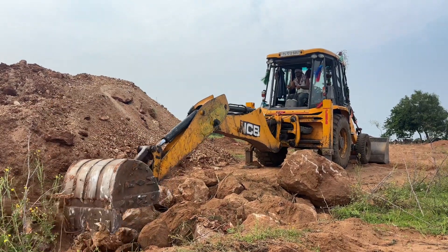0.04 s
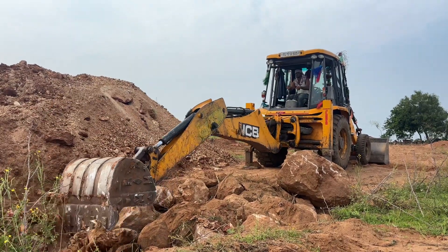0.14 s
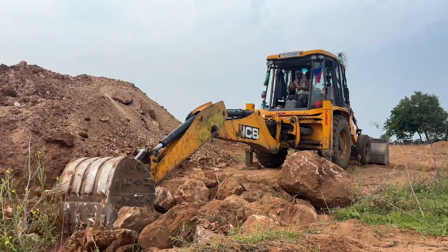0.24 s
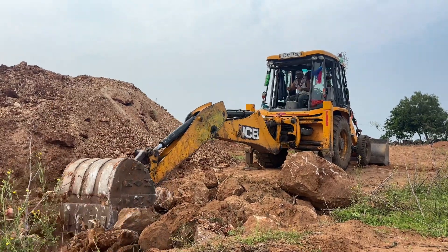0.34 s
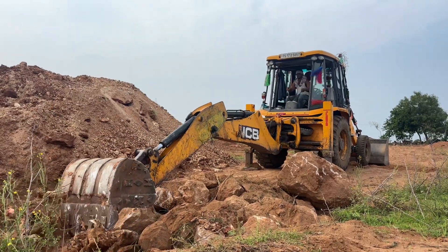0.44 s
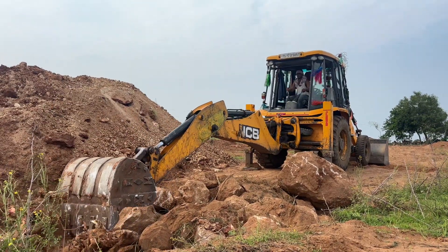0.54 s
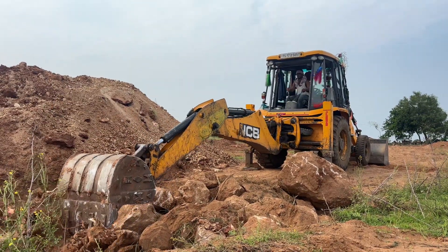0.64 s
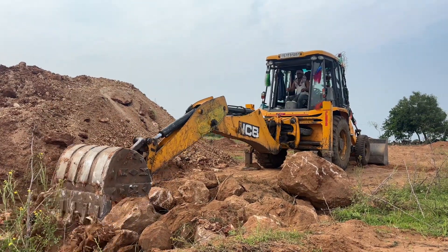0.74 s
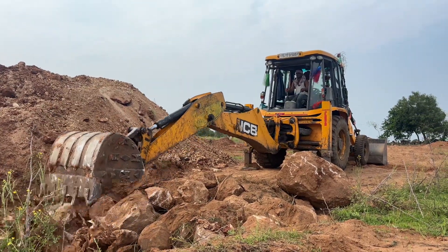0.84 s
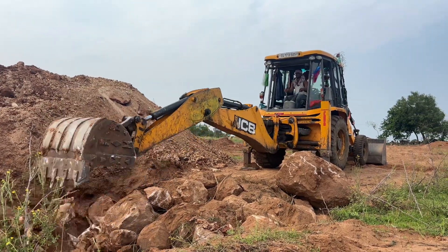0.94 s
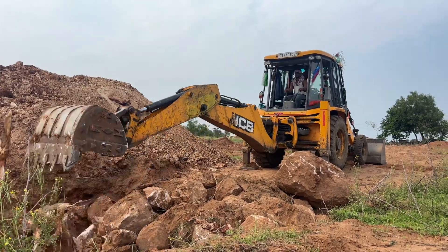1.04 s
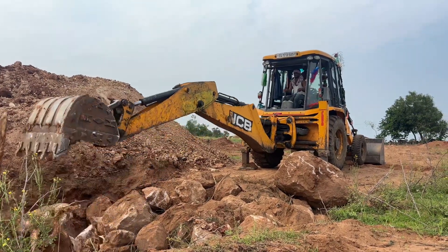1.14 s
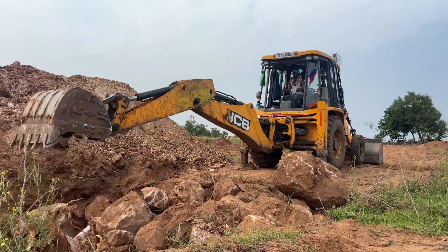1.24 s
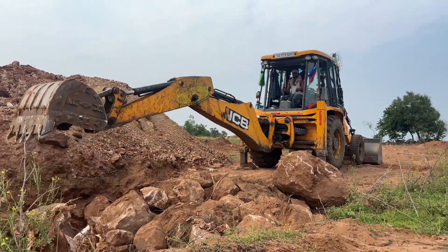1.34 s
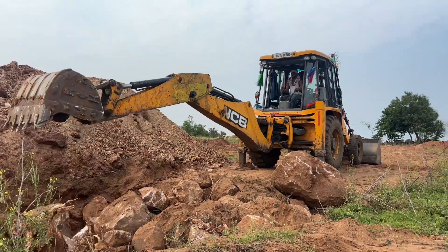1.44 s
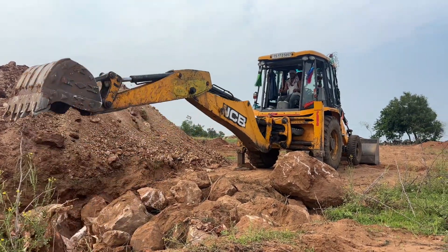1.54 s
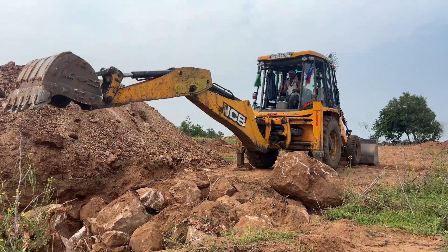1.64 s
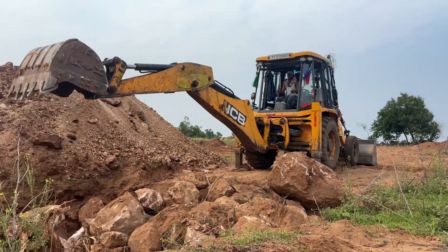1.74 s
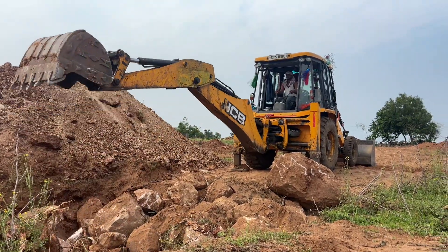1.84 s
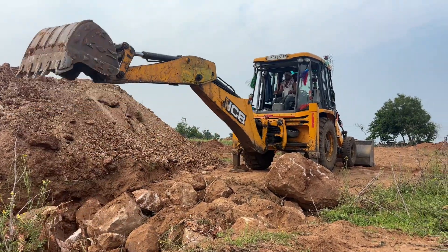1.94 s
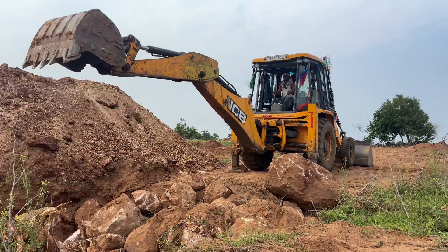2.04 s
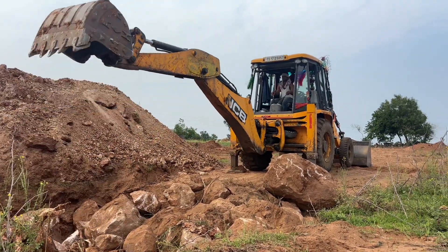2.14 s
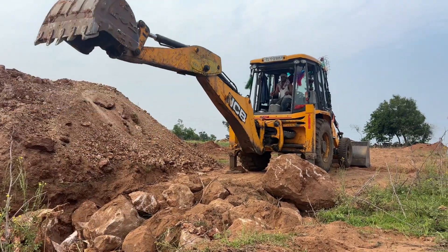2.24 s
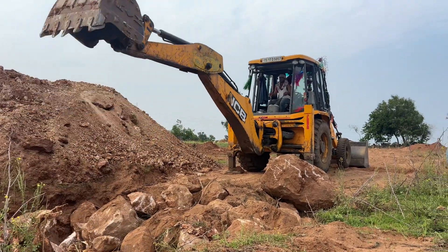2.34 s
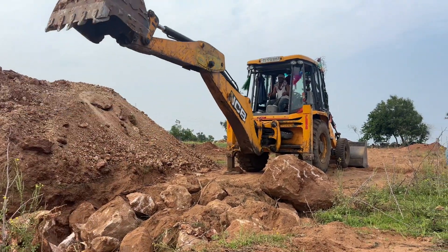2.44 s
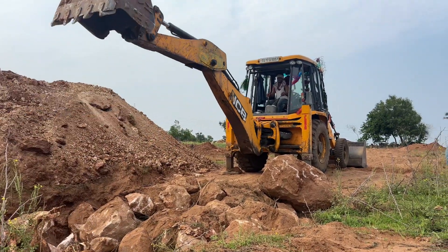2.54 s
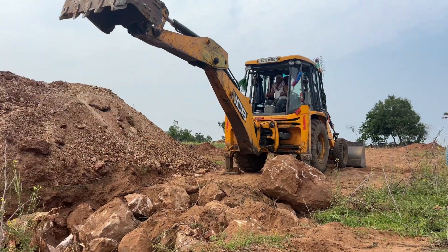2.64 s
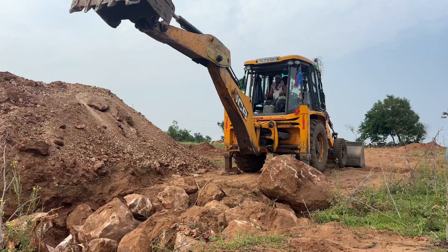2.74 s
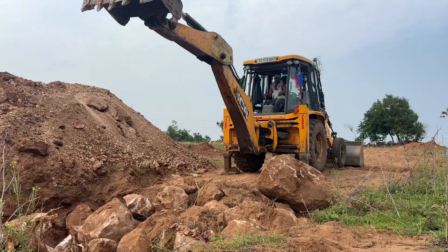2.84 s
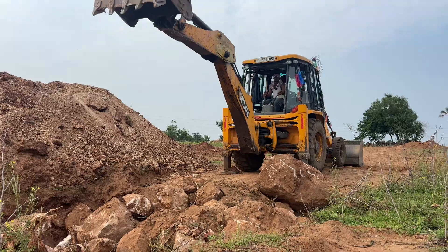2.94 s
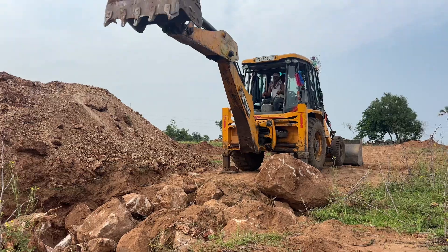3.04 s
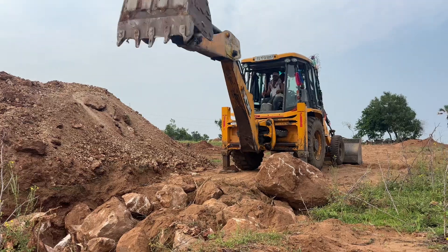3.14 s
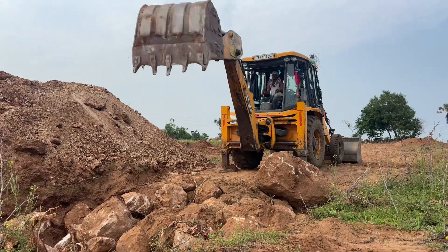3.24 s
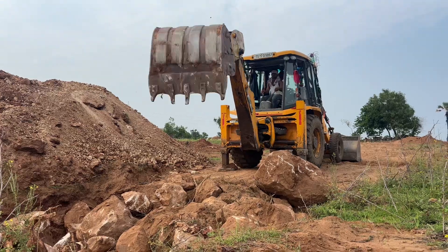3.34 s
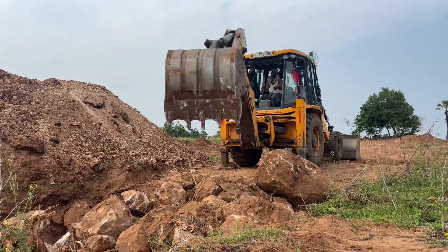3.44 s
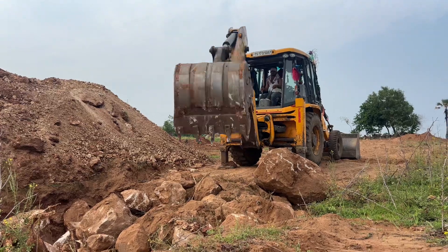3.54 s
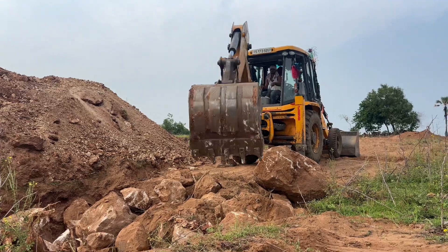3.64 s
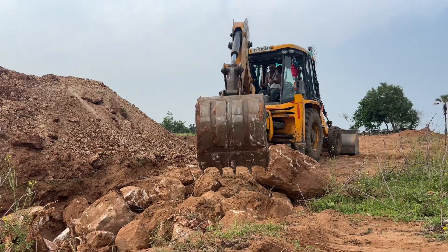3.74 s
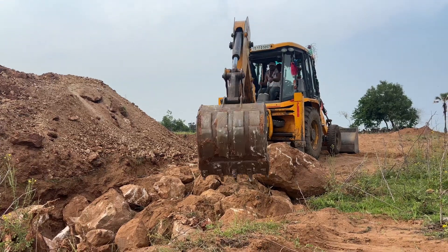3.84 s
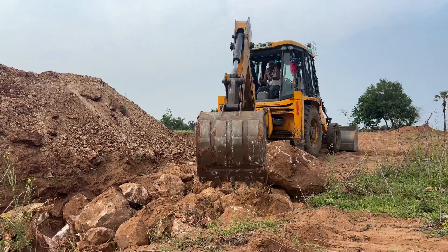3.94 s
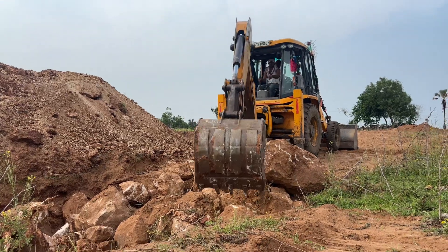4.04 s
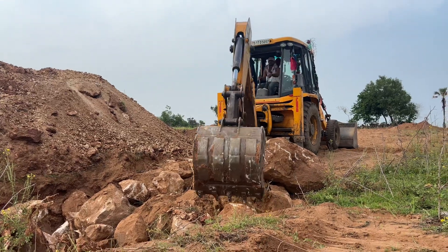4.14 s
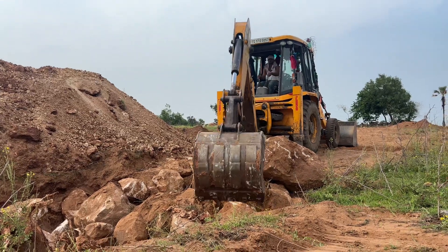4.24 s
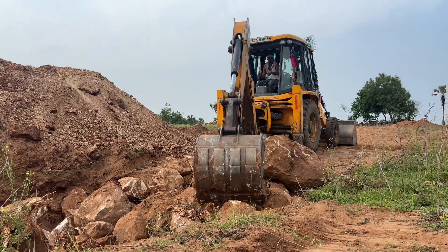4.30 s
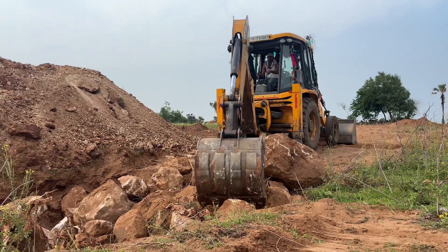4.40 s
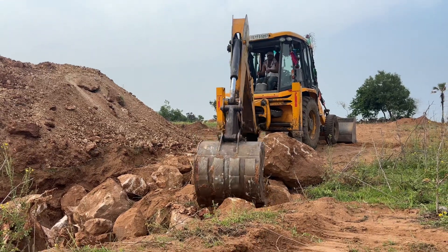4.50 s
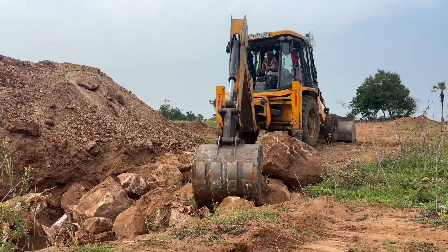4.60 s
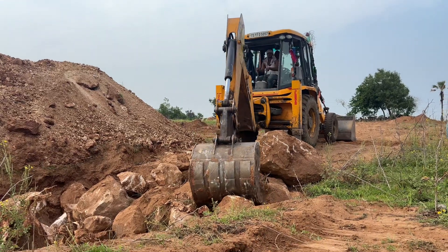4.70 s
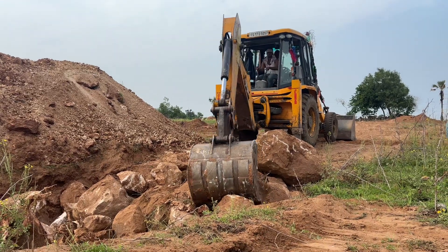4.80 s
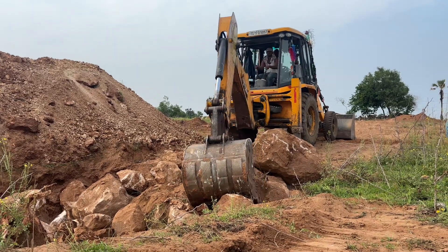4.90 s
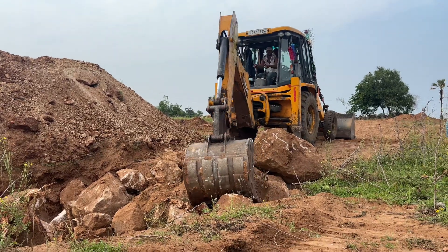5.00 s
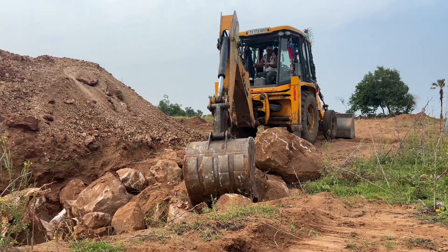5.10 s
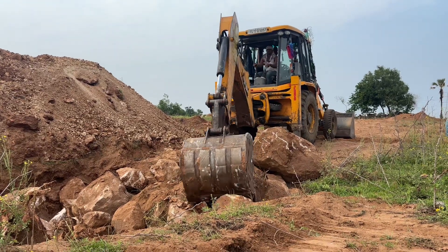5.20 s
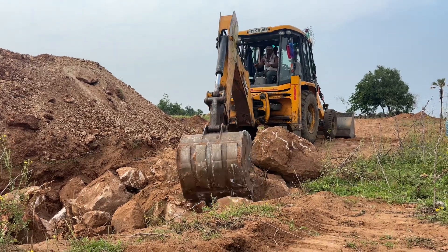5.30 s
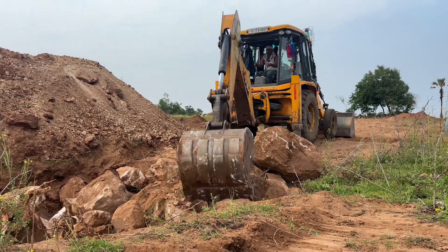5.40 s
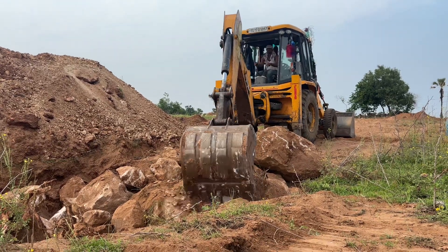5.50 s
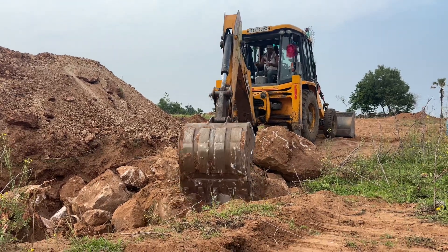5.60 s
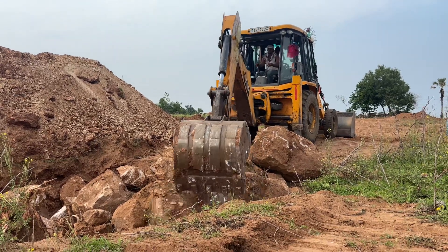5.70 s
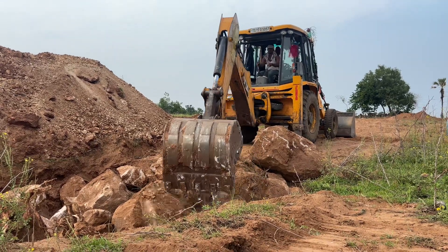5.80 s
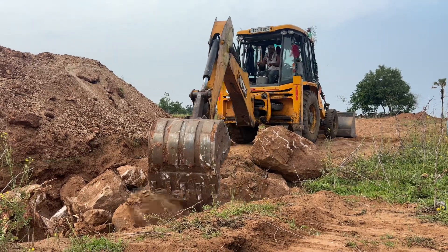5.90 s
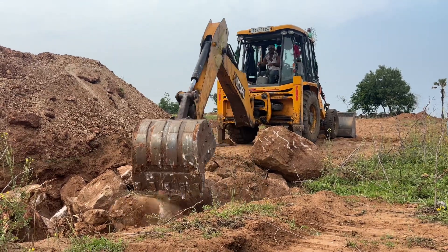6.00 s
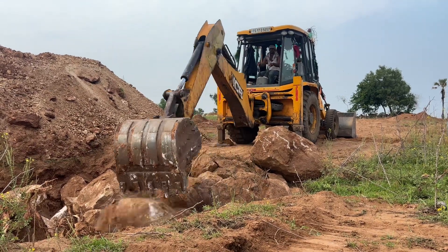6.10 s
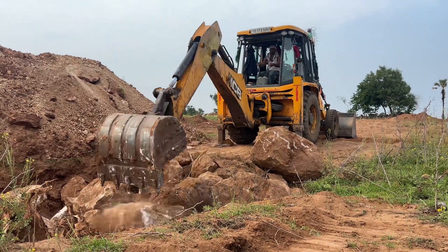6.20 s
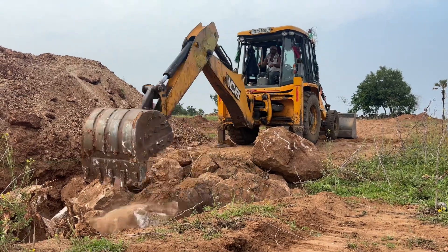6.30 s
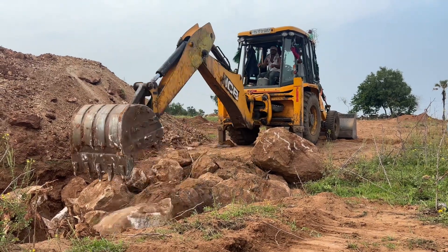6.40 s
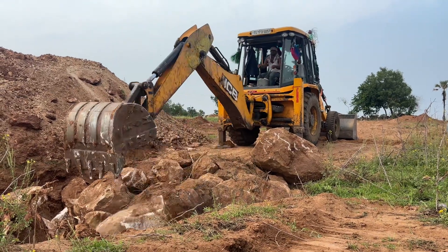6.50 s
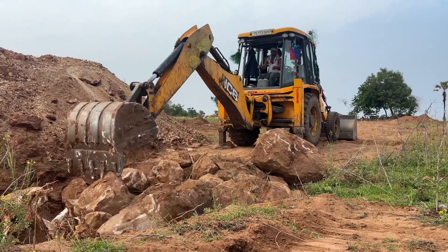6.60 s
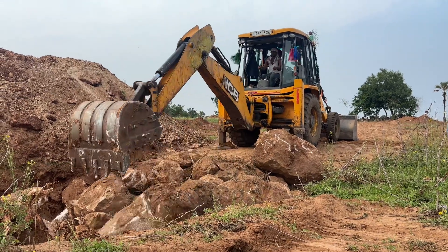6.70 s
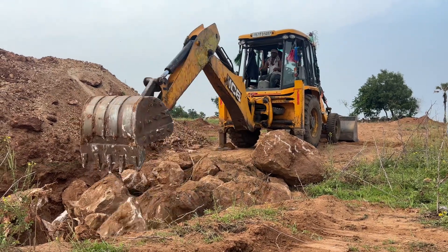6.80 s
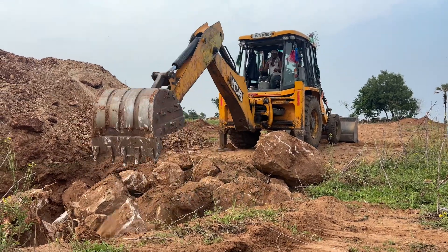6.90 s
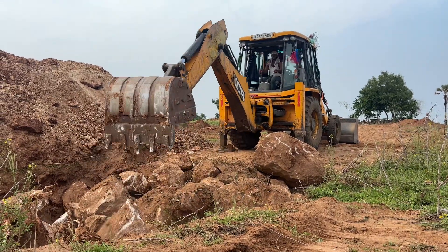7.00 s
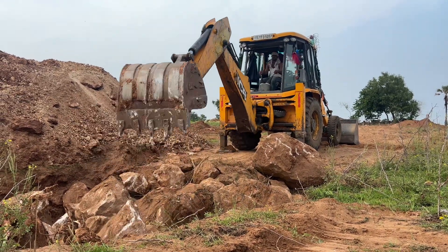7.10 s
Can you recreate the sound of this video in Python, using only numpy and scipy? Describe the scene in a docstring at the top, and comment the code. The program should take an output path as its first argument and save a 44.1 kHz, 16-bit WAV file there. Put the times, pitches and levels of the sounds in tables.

```python
"""A diesel backhoe loader works a heap of boulders in the open: first the pump whines over the engine's
boom and clatter while soil pours and stones and steel knock. The engine eases as the arm swings and oil
rushes at about 3.2 s; a gust swells; from 4.2 s the teeth drag through soil and rubble, and near 5.9 s
a boulder rolls over before the engine labours again. Exhaust and whine are tones locked to the firing,
blows are showers of fractures through ringing steel, and soil, oil and wind are shaped noise."""
import sys
import numpy as np
from scipy import signal
from scipy.fft import rfft, irfft, next_fast_len
from scipy.io import wavfile

SR = 44100
rng = np.random.default_rng(int(sys.argv[2]) if len(sys.argv) > 2 else 0)


def to_wav(sig):
    """Store sig (one row per channel, or 1-D mono) as 16-bit WAV at the path in sys.argv[1].

    Samples outside -1..1 are clipped; the rate is SR.
    """
    pcm = np.clip(np.atleast_2d(sig), -1, 1) * 32767
    pcm = np.round(pcm).astype(np.int16)
    wavfile.write(sys.argv[1], SR, pcm.T)  # frames by channels


N = 315315

# Blows on the bucket: (time [s], clang level [dB], clang centre [Hz], splinters against clang [dB])
BLOWS = [(0.116, -18.5, 1100, -23), (0.242, -21.5, 3200, -7.5), (0.255, -11.5, 1400, -16.5),
         (0.339, -25, 1460, -30), (0.495, -28.5, 1190, -34), (0.577, -23.5, 1300, -14),
         (0.587, -15, 900, -19), (0.609, -15, 1400, -20.5), (0.752, -25, 1150, -22),
         (1.154, -22, 1070, -20), (1.177, -21, 1060, -19), (1.435, -24.5, 1270, -47),
         (2.162, -26.5, 1100, -24), (2.367, -27, 925.6, -27), (3.333, -31, 1002, -37),
         (2.758, -24.5, 915, -23), (4.473, -14, 1080, -16), (4.689, -24, 900, -36), (4.798, -21, 795, -27),
         (4.922, -27, 1582, -10.5), (5.167, -23.5, 510, -20), (5.215, -23, 591.5, -24),
         (5.26, -25.5, 1700, -29), (5.298, -26, 1280, -27), (5.496, -19, 1810, -11.5),
         (5.53, -12.5, 1150, -16), (5.721, -25.5, 1890, -5), (5.755, -17, 458, -25.5),
         (5.803, -21.5, 1934, -31), (5.85, -15, 2230, -6), (5.874, -9.5, 1460, -6),
         (5.928, -14.5, 1020, -25), (5.989, -20.5, 1150, -42), (6.005, -15.5, 1232, -59),
         (6.046, -12.5, 1060, -28), (6.07, -18.5, 2500, -8), (6.126, -8.5, 893, -13),
         (6.198, -20.5, 1470, -27), (6.269, -26, 1699, -38), (6.372, -23.5, 1080, -38),
         (6.387, -19, 962, -26), (6.914, -24.5, 730, -36), (7.058, -22, 970, -25)]
# Edges of the thump, clang and splinter bands: (frequency [Hz])
BLOW_EDGES_HZ = [150, 480, 4800, 14500]
CRUMBLE_T60_S, CRUMBLE_SHORTENS = 0.14, 0.64  # for a clang at 1 kHz; exponent: brighter blows die sooner
THUMP_DB, THUMP_DB_PER_OCTAVE = -4, 0.5  # against a 1 kHz clang; change per octave of clang centre
# Resonances of the steel bucket: (frequency [Hz], width [Hz], level [dB])
BUCKET_MODES = [(241, 32, 3), (368.4, 23, -1), (484, 50, -6), (565, 22, 1.5), (706, 41, -0.5),
                (820.3, 16.7, 5), (947, 260, -4.5), (1074, 15, 0), (1365, 100, -8.5), (1466, 39, 1),
                (1733, 116, -5), (2082, 74, 1.5), (2130, 240, -3), (2500, 1400, -24.5), (2802, 61, 1),
                (3180, 620, -1.5), (3500, 90, 2), (3750, 127, -2), (4390, 110, -5.5), (4940, 32, -5),
                (7040, 140, -12.5), (8640, 360, -3.5)]

# Force of the teeth in the ground: (time [s], push [dB])
PUSH = [(4.25, -7), (4.5, -4.5), (4.8, -1), (5.03, -5), (5.22, 5), (5.42, -4), (6.05, 9.5), (6.3, -9.5),
        (6.7, -8), (7.15, -10)]
# Fade of the dragging as the teeth bite in: (time [s], gain [0-1])
BITE = [(4.2, 0), (4.45, 1)]
RUMBLE_DB, RUMBLE_FOLLOWS = -22.5, 0.52  # at 0 dB of push; share of the push's swing
GRIND_DB, CRUNCH_DB = -34, -41.5  # low and high voice of stones on steel, at 0 dB of push
GRIT_DB, GRIT_FOLLOWS = -52, 0.7  # at 0 dB of push; share of the push's swing
KNOCKS_PER_S, KNOCKS_DB = 22, -45  # random stones bumping the bucket; level at 0 dB of push
ROLL_S, ROLL_HOLD_S, ROLL_DB = 5.86, 0.21, -26.5  # a boulder scrapes along the steel as it rolls

# Rocks knocking on one another: (time [s], peak level [dB], pitch [Hz])
ROCKS = [(0.256, -5, 2620), (0.589, -6, 930), (0.612, -5.5, 1700), (2.759, -15.5, 1420),
         (4.479, -11.5, 1710), (4.645, -19, 1360), (4.691, -21, 1800), (4.798, -13.5, 1400),
         (4.923, -23.5, 3900), (4.85, -28, 2878), (5.214, -22, 4316), (5.263, -21, 2420),
         (5.3, -23.5, 2500), (5.497, -8, 2330), (5.53, -7.5, 2246), (5.938, -8.5, 1325), (6.009, 1.5, 1280),
         (6.06, -6, 1400), (6.156, -12, 2630), (6.361, -9, 1360), (6.39, -11, 1750)]
# Resonances of a rock: (multiple of its pitch, level [dB])
ROCK_MODES = [(0.76, -16), (1, 3), (1.3, -7.5), (1.66, -6)]
ROCK_Q = 10
# Rubble crushed under the teeth: (start [s], hold [s], level [dB])
RUBBLE = [(4.527, 0.3, -39.5), (5.106, 0.1, -33.5)]
# Small stones ticking on stone, and a brief squeal of steel at 4.84 s: (time [s], level [dB], pitch [Hz])
PEBBLES = [(0.828, -20, 4770), (1.061, -17.5, 6600), (1.253, -7, 6559), (4.843, -12.5, 7840),
           (5.409, -21, 2767), (6.101, 2, 13000)]
# Soil pouring off the teeth: (start [s], hold [s], level [dB])
POURS = [(-0.1, 0.16, -51.5), (0.687, 0.17, -49)]
# Hollow clunks of the arm and bucket: (time [s], level [dB], pitch [Hz])
CLUNKS = [(2.185, -26, 412), (3.336, -18.5, 476), (4.505, -14.5, 469.8), (4.585, -21, 485.6),
          (4.647, -18, 698), (6.137, -9.5, 484), (6.272, -13, 699.2), (7.023, -22, 689.5)]
# Boulders shifting in the ground: (time [s], level [dB], pitch [Hz])
THUDS = [(4.338, -13, 191), (4.488, -8, 115.6), (4.6, -14, 132), (5.166, -4, 283.8), (5.218, -6.5, 106.5),
         (5.281, -9.5, 115.6), (5.539, -8.5, 133), (5.78, -24, 101.8), (6.139, -11.5, 106),
         (6.726, -16, 210.4)]

# Engine effort as the arm curls, lifts, swings freely, digs and lifts again:
# (time [s], load [dB], where 0 is working hard)
LOAD = [(0, 0), (0.33, -2), (0.5, 1.5), (0.74, -4.5), (0.88, 0), (1.3, -1), (1.75, -0.5), (2.85, 0.5),
        (3.15, -5), (3.7, -11), (4.3, -9), (4.9, 1.5), (5.7, -0.5), (6.45, -5.5), (6.8, -7), (7.15, 1)]
# Engine speed, rising and sagging: (time [s], firing rate [1/s])
SPEED = [(0, 43.6), (0.2, 48), (0.42, 44.2), (0.63, 45), (0.85, 44.5), (1.25, 46.9), (1.6, 44.3), (2.4, 46),
         (2.8, 44.8), (3.05, 46), (3.45, 47.9), (4.2, 45.8), (5.1, 44), (5.9, 43.5), (6.35, 47), (7.15, 46)]
# Upper exhaust tones: (multiple of the firing rate, level against the octave tone [dB])
OVERTONES = [(1.5, -22), (2.5, -19.5), (3, -10), (4, -17), (5, -31.5), (5.5, -30), (7.5, -26)]
OCTAVE_DB = -21.5  # exhaust tone at twice the firing rate, at 0 dB of load
FIRING_DB, FIRING_FOLLOWS = -27.5, 0.19  # tone at the firing rate, at 0 dB of load; share of its swing
# Resonances of the engine block and panels: (frequency [Hz], width [Hz], level [dB])
BLOCK_MODES = [(234, 14, -1), (329.2, 18.4, 9.5), (458, 42, 3), (548, 25, 4.5), (705, 236, -3.5),
               (759, 19, 8), (924, 34, 4.5), (1093, 55, 1), (1400, 57, -3.5), (1699, 42, -7),
               (1755, 53, -7.5), (2170, 75, -15), (2610, 76, -10.5)]
RATTLE_DB, RATTLE_FOLLOWS = -36, 0.5  # at 0 dB of load; share of the load's swing
WHINE_DB, WHINE_FOLLOWS = -46, 0.85  # gear pump at 0 dB of load; share of the load's swing
WHINE_ORDER = 11.35  # multiple of the firing rate
CURL_HOLD_S, CURL_WHINE_DB = 1.0, 5.5  # extra whine until the bucket is out of the heap
# Faintly singing timing gears: (multiple of the firing rate, level [dB])
GEAR_TONES = [(52, -66), (78, -63.5)]
# Spectrum of the oil flow and fan: (frequency [Hz], level per Hz [dB])
HISS = [(200, 9), (900, 7), (2000, 4), (3500, 0), (4600, -4.5), (6000, -14.5), (7400, -5.5), (9000, -10.5),
        (12500, -12), (14500, -10), (16000, -28)]
# Resonances of oil singing in the valves: (frequency [Hz], width [Hz], level [dB])
VALVE_MODES = [(1069, 22, -4.5), (1307, 26, 2.5), (1374, 24, 3), (1732, 40, -1), (2214, 20, -2),
               (3200, 200, -20), (3715, 110, -13)]
HISS_DB, VALVES_DB = -46.5, -49.5  # oil flow between swings
SWING_S, SWING_HOLD_S, SWING_FLOW_DB = 3.18, 0.048, 4.5  # extra oil flow as the arm swings over

GUST_S, GUST_HOLD_S, GUST_DB = 3.94, 0.49, -29  # start, hold, level before its wavering

# Lead of the left microphone port over the right: (frequency [Hz], phase [rad])
PORT_LEAD = [(0, 0), (1380, -0.3), (1640, -0.8), (2840, 0.5), (4740, 0.2), (5080, -0.5), (5600, -1.2),
             (6400, 0), (7490, -0.0), (8180, -0.9), (9130, -2.7), (9950, -3.14), (10900, -3.7),
             (11800, -6.1), (13700, -6.4), (14600, -9.3), (16100, -9.5)]
# Left port louder than the right by: (frequency [Hz], level [dB])
PORT_BALANCE = [(60, -1.5), (99, 0.5), (160, 1), (270, 0.0), (450, 1.5), (740, -0.5), (1220, 0.5),
                (2010, -0.5), (3330, -1.0), (5500, 1.5), (9080, -2), (15000, 1.5)]
CUTOFF_HZ = 16500


def blows(snap, snap_s, tail_db, tail_t60, chip_s, rebound_s, rebound_db):
    """A snap, a rebound and dying fractures excite a thump, a stone-coloured clang and splinters."""
    t = np.arange(SR // 3) / SR
    out = np.zeros(N)
    low, middle, high, top = BLOW_EDGES_HZ
    for s, db, hz, splinter_db in BLOWS:
        octaves = np.log2(hz / 1000)
        t60 = CRUMBLE_T60_S * 2 ** (-CRUMBLE_SHORTENS * octaves)
        shape = from_db(-60 * t / t60) + snap * np.exp(-t / snap_s) + from_db(tail_db - 60 * t / tail_t60)
        since_rebound = t - rebound_s * rng.uniform(0.43, 1.8)
        rebound = (since_rebound > 0) * np.exp(-np.abs(since_rebound) / snap_s)
        shape = shape + from_db(rebound_db) * rebound
        steel = bucket(shape * grains(6000, 3.1, size=len(t)))

        # The stone's broad peak is applied twice to steepen its colour.
        stone = signal.iirpeak(np.clip(hz, 300, 6000), .74, fs=SR)
        coloured = signal.lfilter(*stone, signal.lfilter(*stone, steel))
        clang = band(coloured, middle, high)
        thump = band(steel, low, middle)
        splinters = band(signal.lfilter([1], [1, -.7], steel), high, top) * np.exp(-t / chip_s)
        thump_db = THUMP_DB + THUMP_DB_PER_OCTAVE * octaves
        for part, part_db in (clang, 0), (thump, thump_db), (splinters, splinter_db):
            # Every part carries the energy of the envelope.
            matched = part * np.linalg.norm(shape) / np.linalg.norm(part)
            add(out, s, from_db(db + part_db) * matched)
    return out


def bucket(force, contact_db=-12, uneven_db=2.5):
    """Bare contact plus ringing steel; each call draws a new mix of modes, like a new point of touch."""
    return from_db(contact_db) * force + resonate(force, BUCKET_MODES, uneven_db)


def drag(judder_db, bump_s):
    """Teeth stick and slip: pushing harder brings more rumble, grinding, bumping stones and grit."""
    push_db = in_time(PUSH)[0]
    slip = rms_one(from_db(judder_db * drift(29.0)))
    steel = bucket(slip * grains(2500, 4.7))

    rumble_noise = rms_one(band(rng.standard_normal(N), 47.3, 124.3))
    rumble = from_db(RUMBLE_DB + RUMBLE_FOLLOWS * push_db) * rumble_noise
    grind = from_db(GRIND_DB + push_db) * rms_one(band(steel, 153, 550))

    # Each random bump starts a short exponential swell of the crunch.
    hits = np.abs(grains(KNOCKS_PER_S, 0.5)) + 1e-18
    bumps = rms_one(signal.lfilter([1], [1, -np.exp(-1 / (bump_s * SR))], hits))
    roll = swell(ROLL_S, attack_s=0.12, hold_s=ROLL_HOLD_S, release_s=0.08)
    rolling = from_db(ROLL_DB) * roll * from_db(1.3 * drift(29.6))
    contact = from_db(push_db) * (from_db(CRUNCH_DB) + from_db(KNOCKS_DB) * bumps) + rolling
    crunch = contact * rms_one(band(signal.lfilter([1], [1, -.92], steel), 605, 2600))

    grit_noise = rms_one(band(grains(3000, 0.6), 4200, 11700))
    grit = from_db(GRIT_DB + GRIT_FOLLOWS * push_db) * slip * grit_noise
    return in_time(BITE)[0] * (rumble + grind + crunch + grit)


def cracks(chatter_db, chatter_t60, grit_db):
    """Rocks meet and chatter; both ring, heavily damped, and soil between them dulls the click."""
    t = np.arange(SR // 6) / SR
    out = np.zeros(N)
    for s, db, hz in ROCKS:
        chatter = from_db(chatter_db - 60 * t / chatter_t60) * grains(4000, 1.7, size=len(t))
        force = (t == 0) + chatter
        modes = [(hz * ratio, hz * ratio / ROCK_Q, mode_db) for ratio, mode_db in ROCK_MODES]
        ring = resonate(force, modes, uneven_db=5.0)
        knock = band(ring + from_db(grit_db) * force, hz * 0.55, hz * 1.42)
        add(out, s, from_db(db) * knock / np.abs(knock).max())
    return out


def rubble(per_s, spread_db, q):
    """Small stones of many sizes click, each size a resonance, as the teeth crush through them."""
    crushing = sum(from_db(db) * swell(s, attack_s=0.04, hold_s=hold_s, release_s=0.033)
                   for s, hold_s, db in RUBBLE)
    clicks = sum(resonate(grains(per_s, spread_db), [(hz, hz / q, -6.5 * np.log2(hz))])
                 for hz in np.geomspace(620, 3400, 9))
    return crushing * rms_one(clicks)


def pebbles():
    """Small stones tick brightly and loose soil trickles from the teeth as high-passed tiny grains."""
    pouring = sum(from_db(db) * swell(s, attack_s=0.12, hold_s=hold_s, release_s=0.21)
                  for s, hold_s, db in POURS)
    trickle = pouring * rms_one(band(grains(1700, 1.1), 2500, 12200))
    return trickle + knocks(PEBBLES, cycles=49, rough=1.0, attack_s=0.0018)


def knocks(rows, cycles, rough, attack_s):
    """Parts meet and ring around one pitch, falling 60 dB in `cycles` cycles, so low pitches last longer."""
    t = np.arange(SR // 3) / SR
    out = np.zeros(N)
    for s, db, hz in rows:
        noise = rms_one(band(rng.standard_normal(len(t)), hz * 0.62, hz * 1.79))
        ring = (np.sin(2 * np.pi * hz * t) + rough * noise) / np.hypot(1, rough)
        add(out, s, from_db(db - 60 * t * hz / cycles) * ring * (1 - np.exp(-t / attack_s)))
    return out


def machine():
    """Load swells boom, clatter and whine; their timing and the gears follow one wavering crank."""
    load_db = in_time(LOAD)[0]
    firing_hz = in_time(SPEED)[0]
    turns = np.cumsum(firing_hz * (1 + 0.00198 * drift(11.7))) / SR  # counts firings
    rattle, chuff = clatter(turns, sharpness=12.0, uneven_db=2.3, loose=1.37)
    boom = exhaust(turns, FIRING_DB + FIRING_FOLLOWS * load_db, OCTAVE_DB + load_db,
                   wobble_db=1.5, smear=0.539)
    block = from_db(RATTLE_DB + RATTLE_FOLLOWS * load_db) * rattle
    return boom + from_db(-35) * chuff + block + pump(turns, load_db) + gears(turns) + oil(turns)


def exhaust(turns, firing_db, octave_db, wobble_db, smear):
    """Exhaust pulses boom as a stack of wavering tones; the silencer delays the higher ones more."""
    tones = [(1, firing_db), (2, octave_db)] + [(k, octave_db + db) for k, db in OVERTONES]
    boom = 0
    for k, db in tones:
        gain = np.sqrt(2) * from_db(db + wobble_db * drift(17.0))
        boom = boom + gain * np.cos(np.pi * np.round(2 * k) * turns + smear * k * k)
    return boom


def clatter(turns, sharpness, uneven_db, loose, size=3900):
    """Each firing rattles the block, part repeating every four firings and part loose; low noise chuffs."""
    stroke = turns.astype(int)
    strength = from_db(uneven_db * rng.standard_normal(N)[stroke])
    gate = strength * (0.33 + np.exp(-sharpness * (turns % 1)))
    cycle = rms_one(irfft(np.exp(2j * np.pi * rng.random(size // 2 + 1))))
    repeating = np.interp(turns / 4 % 1, np.arange(len(cycle)) / len(cycle), cycle)
    rattle = gate * (repeating + loose * rng.standard_normal(N))
    chuff = band(gate * rng.standard_normal(N), 41, 214.0)
    return rms_one(resonate(rattle, BLOCK_MODES)), rms_one(chuff)


def pump(turns, load_db):
    """The gear pump whines at a fixed multiple of the firing rate, louder under load and in the curl."""
    curl = swell(0, attack_s=.02, hold_s=CURL_HOLD_S, release_s=0.22)
    pump_db = WHINE_DB + WHINE_FOLLOWS * load_db + CURL_WHINE_DB * curl
    return from_db(pump_db + 5.4 * drift(19)) * np.sin(2 * np.pi * WHINE_ORDER * turns + .5 * drift(13))


def gears(turns):
    """Timing gears sing wavering sines at high multiples of the firing rate."""
    return sum(from_db(db + 7.2 * drift(3.3)) * np.sin(2 * np.pi * k * turns) for k, db in GEAR_TONES)


def oil(turns):
    """Flowing oil hisses, pulsed slightly by the firing, and whistles in the valves; the swing lifts both."""
    flow = rng.standard_normal(N) * (1 + 0.035 * np.cos(2 * np.pi * turns)) * from_db(.5 * drift(25))
    spectrum = rfft(flow) * from_db(at_hz(HISS, np.fft.rfftfreq(N, 1 / SR)))
    hiss = rms_one(irfft(spectrum, N))
    swing = swell(SWING_S, attack_s=0.19, hold_s=SWING_HOLD_S, release_s=0.21)
    steady = from_db(HISS_DB) * hiss + from_db(VALVES_DB) * valves(rough_db=2.0)
    return from_db(SWING_FLOW_DB * swing) * steady


def valves(rough_db):
    """Oil forced through the spool valves whistles faintly: noise through narrow resonances."""
    return rms_one(resonate(rng.standard_normal(N), VALVE_MODES)) * from_db(rough_db * drift(9.6))


def breeze(buffet_db, rustle_db):
    """Air brushes each microphone port on its own, harder in the gust, and stirs the grass."""
    buffet = rms_one(band(signal.lfilter([1], [1, -.99], rng.standard_normal((2, N))), 38, 400))
    gust_noise = rms_one(band(rng.standard_normal((2, N)), 43, 150))
    gust = gust_noise * swell(GUST_S, attack_s=1.0, hold_s=GUST_HOLD_S, release_s=1.0)
    rustle = rms_one(band(signal.lfilter([1], [1, -.85], rng.standard_normal((2, N))), 400, 5400))
    wind = from_db(buffet_db + 1.5 * drift(6.0)) * buffet + from_db(GUST_DB + 2.3 * drift(4.6)) * gust
    return wind + from_db(rustle_db) * rustle


def outdoors(x, scatter_db, t60, far_db, far_t60, lowest_hz):
    """Stones scatter a short tail, the earth bank a fainter, longer one; long bass waves pass by."""
    t = np.arange(SR // 2) / SR
    near = from_db(-60 * t / t60) * (1 - np.exp(-t / 0.0018))
    far = from_db(-60 * t / far_t60) * (1 - np.exp(-t / 0.047))
    shape = from_db(scatter_db) * near / np.linalg.norm(near) + from_db(far_db) * far / np.linalg.norm(far)
    tails = band(shape * rng.standard_normal((2, len(t))), lowest_hz, 22000)
    return x + signal.fftconvolve(x[None], tails, axes=1)[:, :N]


def from_db(db):
    """Decibels to gain."""
    return 10 ** (np.asarray(db) / 20)


def rms_one(x):
    """Scale to rms 1."""
    return x / np.sqrt(np.mean(x ** 2) + 1e-20)


def in_time(rows):
    """Each column of a curve at every sample."""
    s, *columns = np.transpose(rows)
    return [np.interp(np.arange(N) / SR, s, c) for c in columns]


def at_hz(points, hz):
    """Read a spectrum on a log-frequency axis."""
    point_hz, level = np.transpose(points)
    return np.interp(np.log(hz + 1), np.log(point_hz), level)


def band(x, low_hz, high_hz):
    """Causal band-pass."""
    edges = [low_hz, min(high_hz, .45 * SR)]
    return signal.sosfilt(signal.butter(3, edges, "band", fs=SR, output="sos"), x + 1e-18)


def drift(rate_hz):
    """Smooth random wobble of rms 1: noise at a fortieth of SR, low-passed near `rate_hz`."""
    r = np.exp(-80 * np.pi * rate_hz / SR)
    noise = rng.standard_normal(N // 40 + 2002)
    slow = signal.lfilter([1], [1, -2 * r, r * r], noise)[2000:]  # skip the filter's settling
    return np.interp(np.arange(N) / 40, np.arange(len(slow)), rms_one(slow))


def grains(per_s, spread_db, size=N):
    """Random tiny fractures of uneven size and either sign; rms 1."""
    sizes = from_db(spread_db * np.minimum(rng.exponential(1, size), 4)) * rng.choice([-1, 1], size)
    return rms_one(sizes * (rng.random(size) < per_s / SR))


def resonate(x, modes, uneven_db=0):
    """Parallel resonances of alternating sign, each excited with a strength of its own."""
    out = 0
    for k, (hz, width, db) in enumerate(modes):
        r = np.exp(-np.pi * width / SR)
        gain = (-1) ** k * from_db(db + uneven_db * rng.standard_normal()) * (1 - r * r) / 2
        poles = [1, -2 * r * np.cos(2 * np.pi * hz / SR), r * r]
        out = out + gain * signal.lfilter([1, 0, -1], poles, x + 1e-18)
    return out


def swell(start_s, attack_s, hold_s, release_s):
    """Rise to 1, hold, then die away exponentially."""
    t = np.arange(N) / SR - start_s
    return np.clip(t / attack_s, 0, 1) * np.exp(-np.maximum(t - attack_s - hold_s, 0) / release_s)


def add(track, s, sound):
    """Mix a sound in at a time."""
    start = max(int(s * SR), 0)
    track[start:start + len(sound)] += sound[:max(N - start, 0)]


def scene():
    """Digging close by and the machine behind it, straight ahead, in a breeze."""
    stones = blows(snap=0.27, snap_s=0.00056, tail_db=-68, tail_t60=0.16, chip_s=0.39,
                   rebound_s=0.011, rebound_db=-10.5)
    stones = stones + drag(judder_db=3.5, bump_s=0.017) + pebbles()
    stones = stones + cracks(chatter_db=-22, chatter_t60=0.067, grit_db=-9.5)
    stones = stones + rubble(per_s=70, spread_db=-0.5, q=12)
    joints = knocks(CLUNKS, cycles=110, rough=0.37, attack_s=0.0018)
    boulders = knocks(THUDS, cycles=24.3, rough=0.48, attack_s=0.0027)
    digging = outdoors(stones + joints + boulders, scatter_db=-12.5, t60=0.043,
                       far_db=-19.5, far_t60=0.36, lowest_hz=155)
    engine = outdoors(machine(), scatter_db=-10.0, t60=0.11, far_db=-30, far_t60=0.31, lowest_hz=720)
    return digging + engine + breeze(buffet_db=-47, rustle_db=-59)


def record(dry):
    """Two ports differ in phase and level across frequency; peaks are rounded and the top is cut."""
    size = next_fast_len(N + SR // 4)
    hz = np.fft.rfftfreq(size, 1 / SR)
    sides = np.array([[.5], [-.5]])  # half of each difference to the left, half to the right
    lead = np.interp(hz, *np.transpose(PORT_LEAD))
    balance_db = np.interp(hz, *np.transpose(PORT_BALANCE))
    ports = np.exp(1j * lead * sides) * from_db(balance_db * sides)
    pair = irfft(rfft(dry, size) * ports, size)[:, :N]
    return signal.sosfilt(signal.cheby2(16, 70, CUTOFF_HZ, fs=SR, output="sos"), np.tanh(pair))


dry = scene()
out = record(dry)
to_wav(out)
```